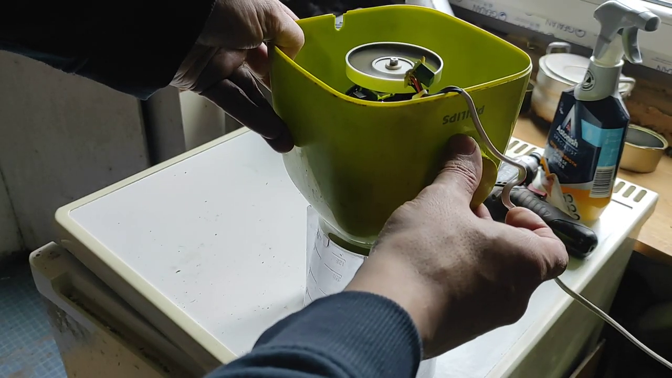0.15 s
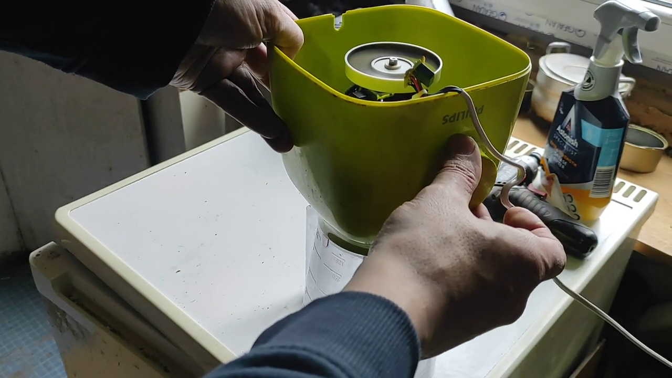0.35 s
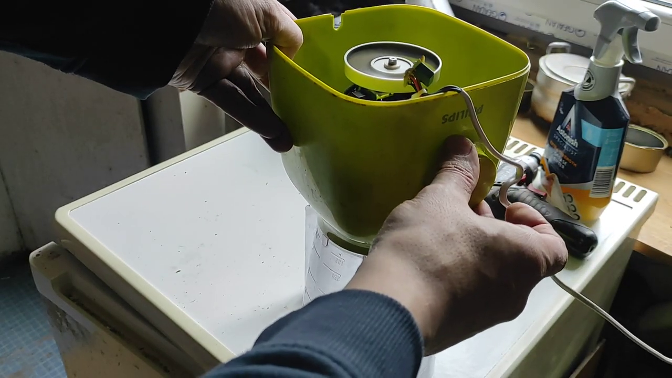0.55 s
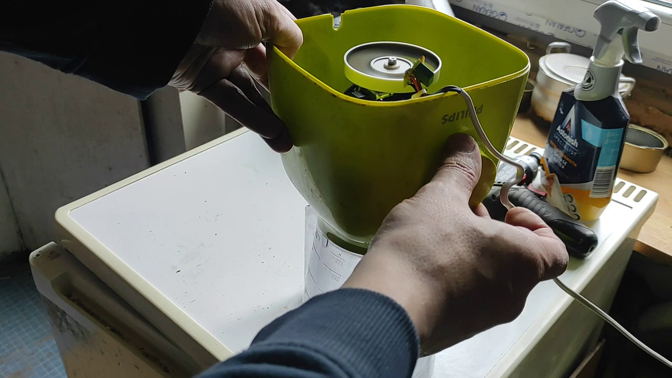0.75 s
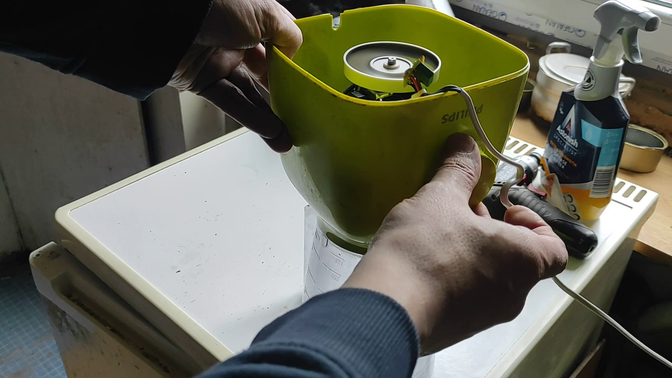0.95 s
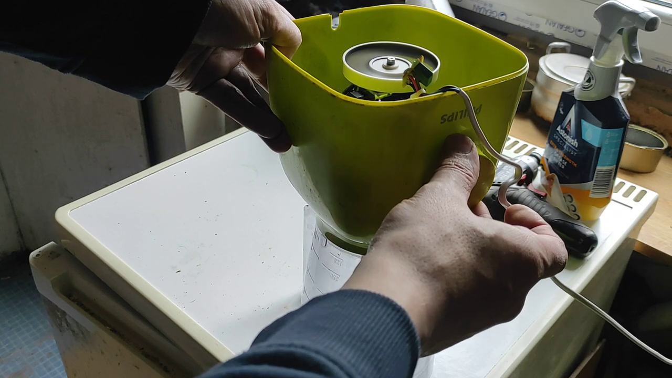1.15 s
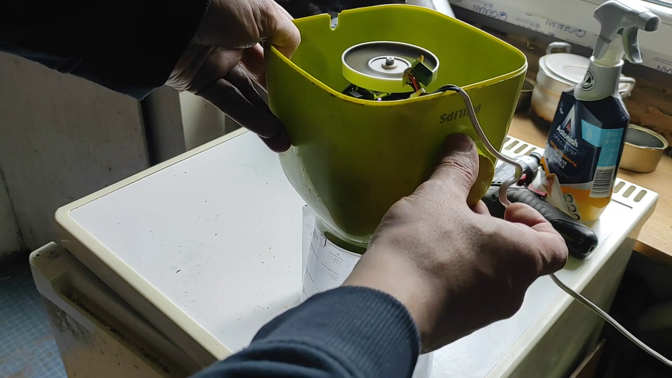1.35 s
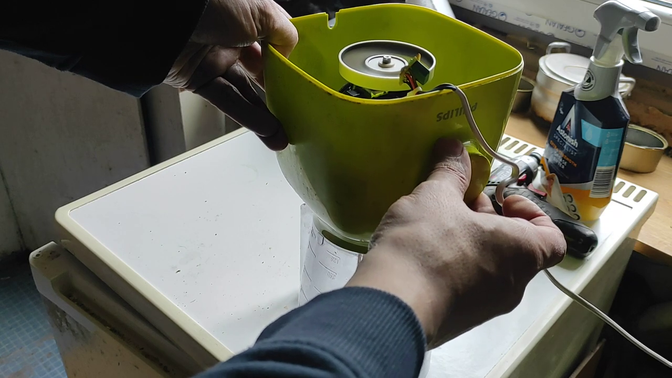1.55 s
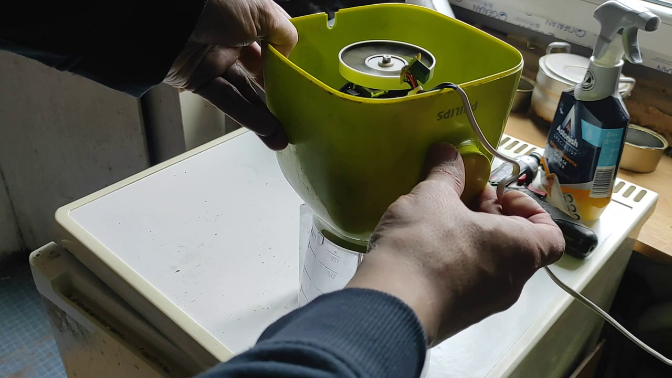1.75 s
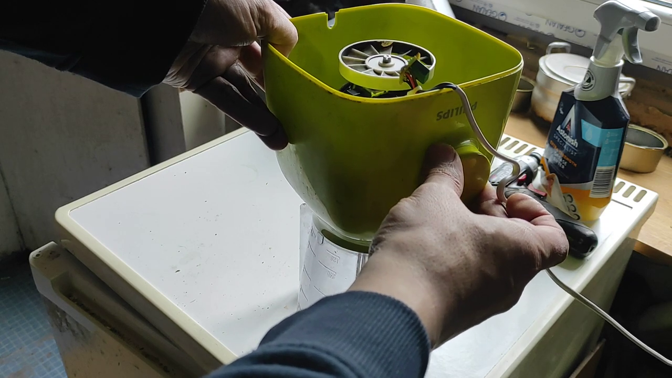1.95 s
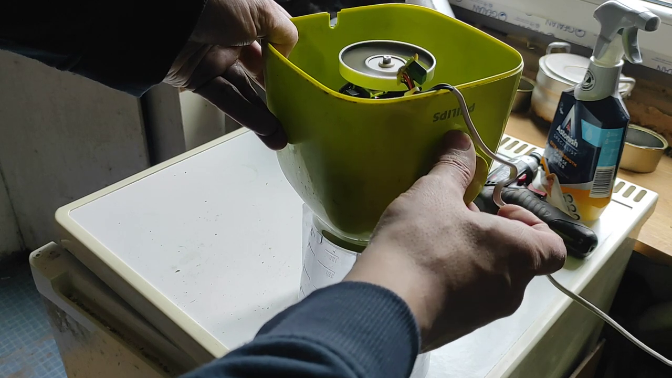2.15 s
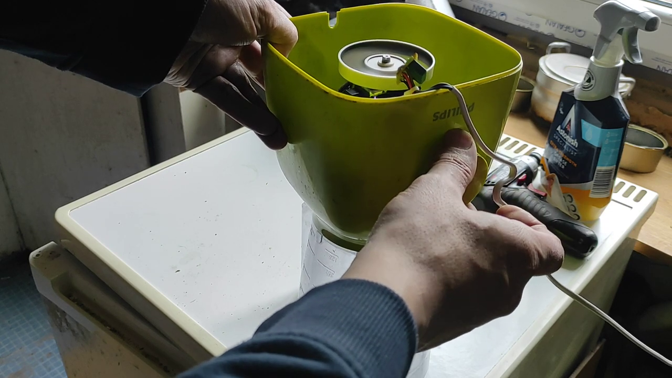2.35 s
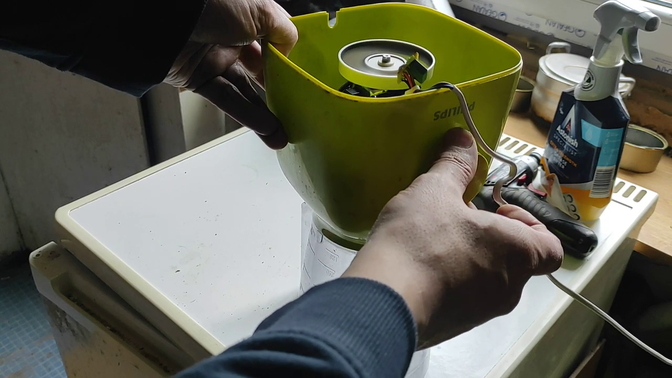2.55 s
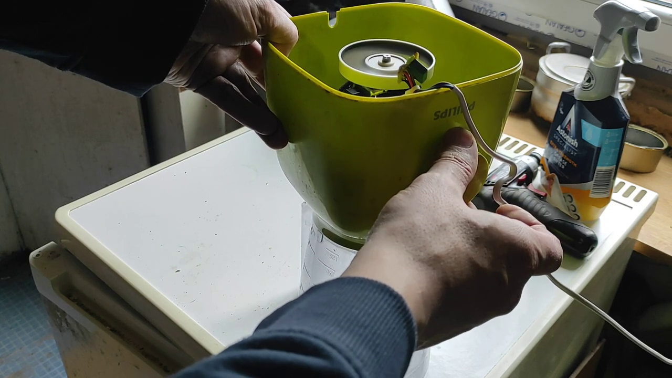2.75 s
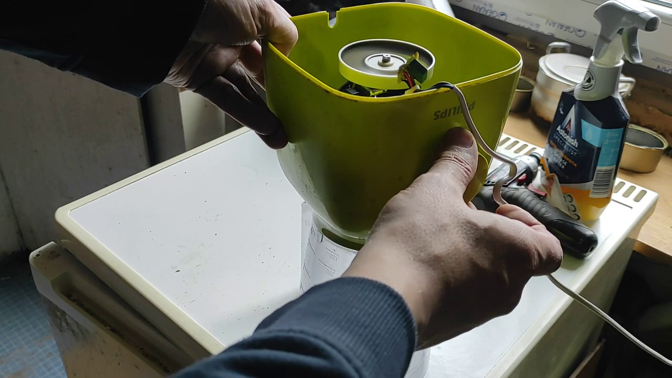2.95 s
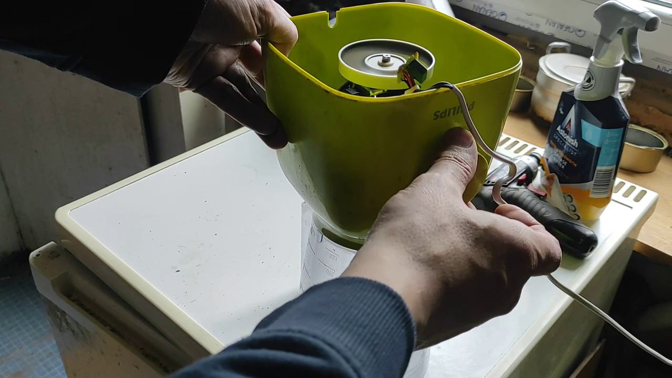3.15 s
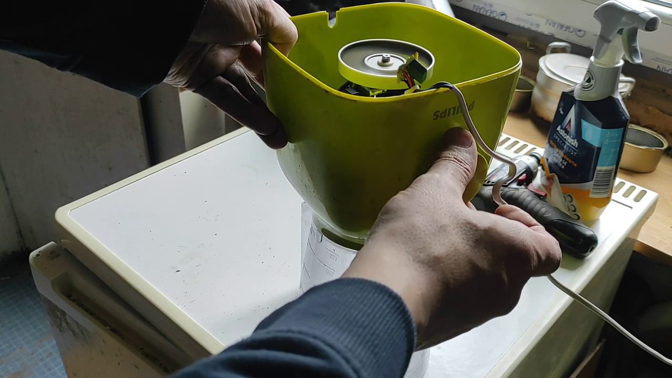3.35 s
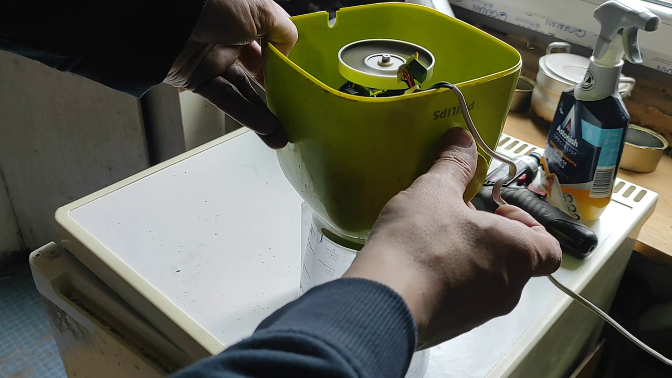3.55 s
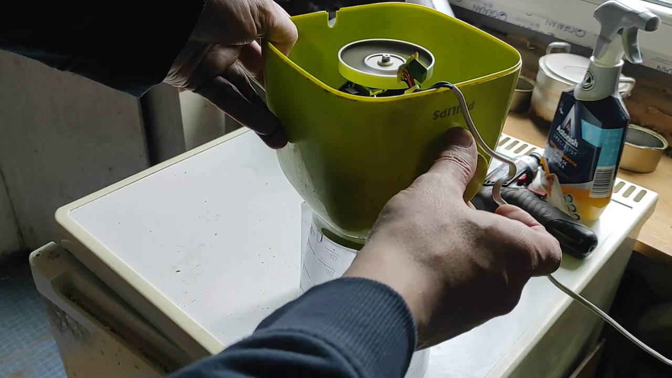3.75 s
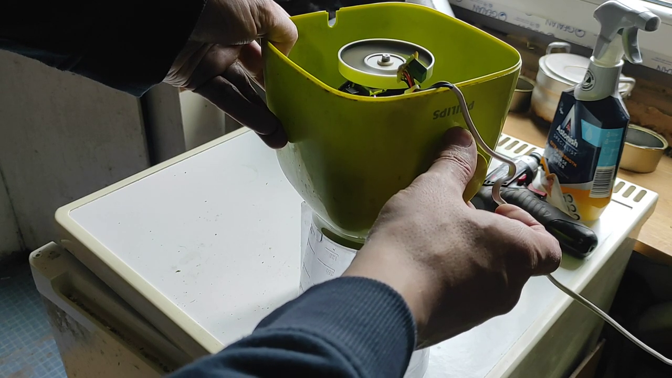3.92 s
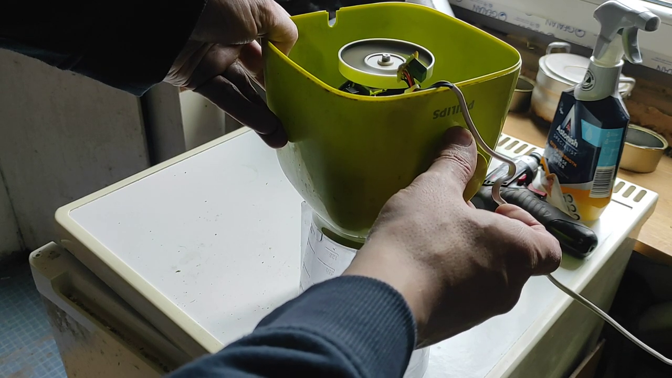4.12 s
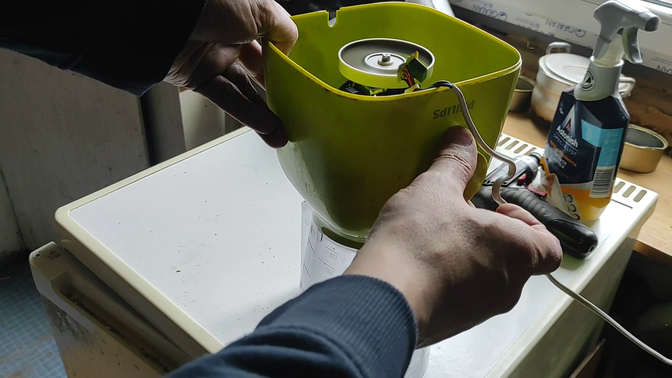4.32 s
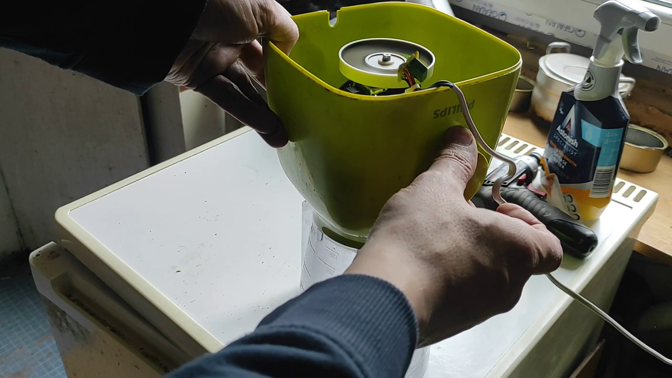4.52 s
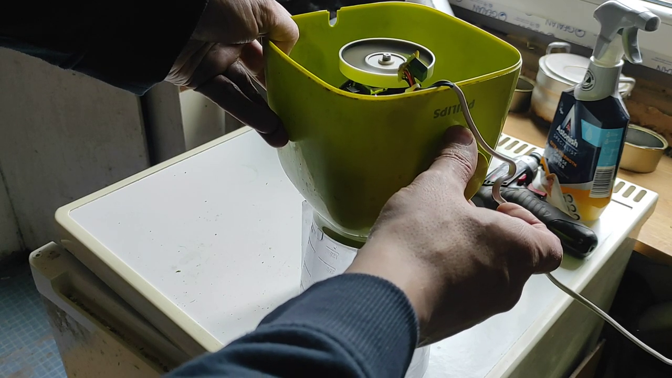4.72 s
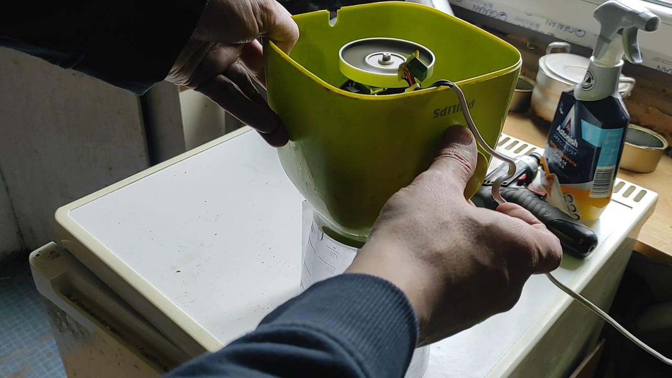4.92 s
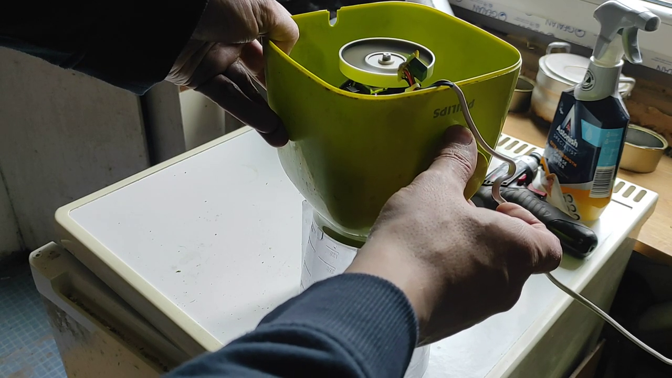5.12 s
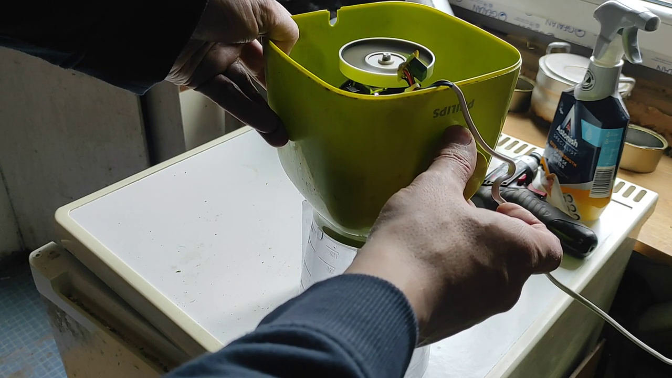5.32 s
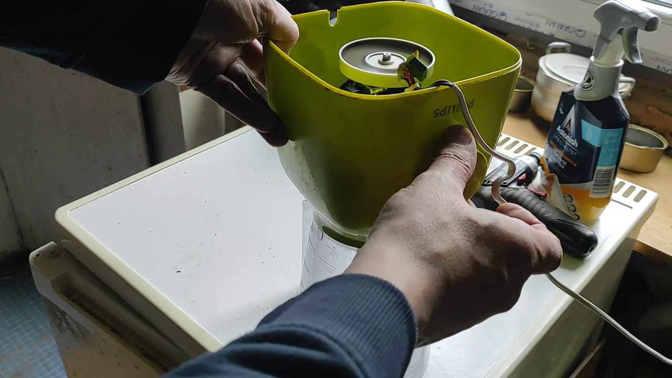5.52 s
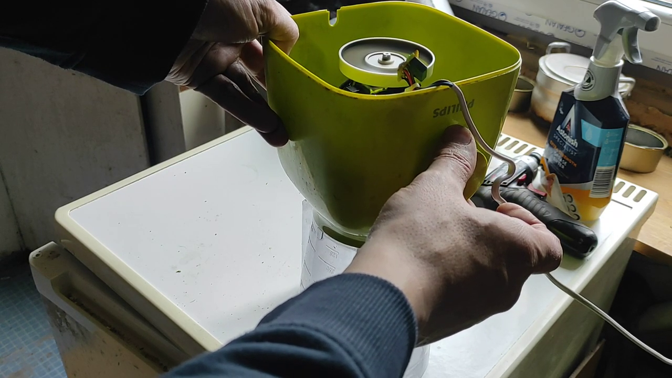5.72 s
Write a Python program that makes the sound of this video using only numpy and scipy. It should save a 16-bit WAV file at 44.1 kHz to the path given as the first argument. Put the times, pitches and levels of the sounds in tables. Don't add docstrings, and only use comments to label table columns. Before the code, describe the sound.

A bare blender motor in an open plastic base runs loudly, close to a phone microphone in a small, fairly dry room. From 0 s it is already near full speed: a rough, bright, rattling roar of brushes and loose bearings, with a low hum around 240 Hz and a thin high whine near 5.7 kHz. At about 1.2 s the power is cut; the electrical whine vanishes and the worn bearing gives a harsh, multi-toned squeal with clatter, its pitches shifting as the rotor slows, abruptly halting around 1.85 s with a short ring. Near-silence follows, only faint room noise and a light rub on the switch near 2.1 s. At about 2.18 s the motor jolts on, its whine sweeping up within half a second. It then roars steadily to the end near 6 s, fluttering with small irregular surges and dips.

```python
import sys
import numpy as np
from scipy import signal
from scipy.fft import rfft, irfft
from scipy.io import wavfile
from scipy.ndimage import uniform_filter1d, minimum_filter1d

SR = 44100
rng = np.random.default_rng(int(sys.argv[2]) if len(sys.argv) > 2 else 0)


def store_wav(level_fs):
    pcm = np.round(np.clip(np.atleast_2d(level_fs), -1, 1) * 32767)
    wavfile.write(sys.argv[1], SR, pcm.T.astype(np.int16))


def gain_from_decibels(decibels):
    exponent = np.asarray(decibels, float) / 20
    return 10 ** exponent


N = 259308
TIME = np.arange(N) / SR

SWITCH_ON_S, SWITCH_OFF_S = (-.21, 2.181), 1.185
FULL_HZ = 239.5
# [t/s, shaft f/Hz, whirl centre f/Hz, squeal level/dB]
COAST = [(1.19, 244, 806, -29), (1.26, 215, 827, -26), (1.31, 201, 826, -25), (1.37, 183, 807, -26),
         (1.55, 172, 800, -28), (1.6, 165, 801, -26), (1.71, 100, 808, -22), (1.79, 46, 802, -22),
         (1.835, 20, 790, -22)]


def level(x, db):
    return x * gain_from_decibels(db) / np.sqrt(np.mean(x ** 2))


def columns(table, **ends):
    s, *rest = np.transpose(table)
    return [np.interp(TIME, s, c, **ends) for c in rest]


def on_log(hz, table):
    points = np.array(table)
    return np.interp(np.log(hz + 1), np.log(points[:, 0]), points[:, 1])


def ramp(start_s, length_s):
    return np.clip((TIME - start_s) / length_s, 0, 1)


def colour(x, spectrum, modes=(), size=2 ** 15):
    hz = np.fft.rfftfreq(size, 1 / SR)
    db = on_log(hz, spectrum)
    for mode_hz, width_hz, mode_db in modes:
        resonance = (gain_from_decibels(mode_db) - 1) / (1 + (2 * (hz - mode_hz) / width_hz) ** 2)
        db = db + 20 * np.log10(1 + resonance)
    ceps = irfft(db * np.log(10) / 20)
    ceps[1:size // 2] *= 2
    ceps[size // 2 + 1:] = 0
    impulse = irfft(np.exp(rfft(ceps)))[None, :size // 2]
    return signal.fftconvolve(x, impulse, axes=-1)[:, :N]


def walk(rate):
    k = int(SR / rate)
    held = np.repeat(rng.standard_normal(N // k + 1), k)
    return 1.1 * uniform_filter1d(uniform_filter1d(held, k), k)[:N]


def tone(hz, rough, rate):
    rough = np.clip(rough, 0, 1)
    waver = np.sqrt(1 - rough) + np.sqrt(rough / 2) * (walk(rate) + 1j * walk(rate))
    return np.sqrt(2) * np.real(waver * np.exp(2j * np.pi * np.cumsum(hz) / SR))


def shaft():
    creep_hz_per_s = 1.5
    climb_hz, climb_s, kick_s = 128, .25, .09
    age = np.where(TIME < SWITCH_ON_S[1], TIME - SWITCH_ON_S[0], TIME - SWITCH_ON_S[1])
    climb = climb_hz * np.exp(-age / climb_s)
    kick = (FULL_HZ - climb_hz) * np.exp(-age / kick_s)
    powered = FULL_HZ + creep_hz_per_s * age - climb - kick
    coasting = (TIME > SWITCH_OFF_S) & (TIME < SWITCH_ON_S[1])
    return np.where(coasting, columns(COAST)[0], np.maximum(powered, COAST[-1][1]))


def effort(shaft_hz, coast):
    # [powered level/dB, lost at standstill/dB, share of surges, coasting level/dB, lost slowing/dB]
    rattle_bands = [
        (-29, 5, 0.36, -22, 12.5),
        (-23, 9.5, 0.92, -14, 5),
        (-17.5, 11, 0.89, -15, -0.3),
    ]
    # [t/s, level/dB]
    lulls = [(.011, 3.5), (.088, -0.5), (.145, 0), (.653, -3), (.718, 0.5), (.983, -0.5), (1.051, -0.5),
             (1.129, -1.5), (2.22, -2), (2.817, -3), (3.072, -2), (3.155, -1.5), (3.234, -5.5),
             (3.475, -2.5), (3.548, -3), (3.656, -4.5), (3.758, -3), (3.921, -5.5), (4.056, -2.5),
             (4.215, -2), (4.353, -6.5), (4.681, -6), (4.914, -5.5), (5.101, -5.5), (5.396, -2),
             (5.74, -4.5)]
    # [t/s, level/dB]
    bursts = [(.064, 9), (.186, 6), (.257, 4.5), (.536, 3), (.813, 4.5), (.911, 9.5), (1.2, 9), (2.192, 1),
              (2.256, 4.5), (2.444, 3.5), (2.55, 2.5), (2.76, 5), (2.931, 1.5), (3.034, 3), (3.18, 2),
              (3.279, 0.5), (3.371, -1), (3.704, 3), (4.106, 3), (4.465, 3.5), (4.616, 4), (5.005, 2.5),
              (5.173, 4), (5.333, 1.5), (5.83, 1.5)]
    lull_s, burst_s = .022, .015
    jolts_db, jolt_s = (8, 2.5, 1.5), .04
    stop_s, release_s, attack_s = 1.84, .069, .003
    grip_power = 1.9

    surge = 0
    for rows, width_s in ((lulls, lull_s), (bursts, burst_s)):
        for s, db in rows:
            surge = surge + db * np.exp(-((TIME - s) / width_s) ** 2)
    speed = shaft_hz / FULL_HZ
    jolt = np.exp(-abs(TIME - SWITCH_ON_S[1]) / jolt_s)
    halting = (1 - ramp(stop_s, release_s)) ** 2
    turning = np.where(TIME < SWITCH_ON_S[1], halting, ramp(SWITCH_ON_S[1], attack_s))
    gains = []
    for (on_db, idle_db, share, off_db, slow_db), jolt_db in zip(rattle_bands, jolts_db):
        powered_db = on_db - idle_db * (1 - speed ** grip_power)
        coasting_db = off_db - slow_db * (1 - speed)
        steady_db = (1 - coast) * powered_db + coast * coasting_db
        gains.append(turning * gain_from_decibels(share * surge + jolt_db * jolt + steady_db))
    return gains


def knocking(shaft_hz, coast):
    knock_db, flutter_db, mains, turn = 3, .5, .13, .065
    mains_phase = 2 * np.pi * 50 * TIME
    pulses = np.cos(mains_phase) + .92 * np.cos(2 * mains_phase)
    beat = 1 + (1 - coast) * mains * pulses
    beat *= 1 + turn * np.cos(2 * np.pi * np.cumsum(shaft_hz) / SR + 1.3 * walk(30))
    sizes = np.minimum(rng.exponential(size=N // 8 + 1), 3.5)
    knocks = beat * gain_from_decibels(knock_db * np.repeat(sizes, 8)[:N] + flutter_db * walk(40))
    return level(knocks * rng.standard_normal((2, N)), 0)


def rattle(shaft_hz):
    # [f/Hz, level/dB per Hz]
    powered_spectrum = [(15, -60), (25, -25.5), (125, -15), (238, -7.5), (272, -12), (430, -7), (491, -13),
                        (547, -6), (840, -13.5), (1690, -11.5), (3670, -7.5), (5960, -9), (8440, -10.5),
                        (9910, -18), (15200, -36.5)]
    # [f/Hz, level/dB per Hz]
    coasting_spectrum = [(15, -63), (25, -28), (128, -27.5), (182, -13), (311, -14), (396, -1.5), (478, -9),
                         (625, -8.5), (818, -13), (961, -10.5), (1560, -12), (2210, -7.5), (3770, -5.5),
                         (7000, -1.5), (15200, -30)]
    # [f/Hz, width/Hz, powered level/dB, coasting level/dB]
    case_modes = [(407, 36, 0, 3), (551, 41, 6, 11), (630, 22, 4.5, 3), (745, 8, -3, 9.5),
                  (1224, 43, 1.5, 5.5), (1402.5, 21, 8, 6), (1622, 99, 5, 3.5), (1716, 41, 11.5, 4),
                  (1879, 47, 5, 11), (1932, 64, 4.5, 2), (2104.5, 30.4, 9.5, 13), (2231, 71, 4.5, 9),
                  (2671, 74, -8, -1), (2692, 40, 8.5, 3.5), (3680, 193, -8, -7.5), (3067, 98, -7.5, 2),
                  (2530, 34, -3, 1.5), (3860, 8.7, -11, 6), (5100, 25, -2, -22), (5747, 92, 8.5, -16),
                  (6080, 144, 6.5, 3.5), (6770, 41, 7.5, 3.5), (7230, 450, 7, 3), (7780, 70, 7.5, 3)]

    coast = ramp(SWITCH_OFF_S - .01, .012) * (TIME < SWITCH_ON_S[1] - .05)
    knocks = knocking(shaft_hz, coast)
    bass, middle, treble = effort(shaft_hz, coast)
    rumble = treble * shaft_hz / FULL_HZ * gain_from_decibels(-9)
    bands = ((150, "low", rumble, 7.7), ((150, 1050), "band", bass, 1),
             ((1050, 3750), "band", middle, 1), (3750, "high", treble, 1))
    states = ((1 - coast, powered_spectrum, 2), (coast, coasting_spectrum, 3))
    steady = slice(3 * SR, 5 * SR)
    out = 0
    for edges, kind, gain, division in bands:
        sos = signal.butter(3, edges, kind, fs=SR, output="sos")
        for state, spectrum, k in states:
            modes = [(m[0], m[1], m[k]) for m in case_modes]
            reference = signal.sosfiltfilt(sos, colour(knocks[:1, steady], spectrum, modes))
            ringing = signal.sosfiltfilt(sos, colour(knocks * gain * state, spectrum, modes))
            out = out + ringing / (division * np.std(reference))
    return out


def whine(shaft_hz):
    # [shaft f/Hz, imbalance level/dB, bar level/dB, octave level/dB]
    drive_by_speed = [(80, -80, -70, -85), (150, -46, -56, -58), (175, -37, -48, -51),
                      (198, -35, -37, -44.5), (214, -37, -28, -43.5), (228, -37, -32, -43.5),
                      (236, -35.5, -39, -43.5), (240, -35, -42, -43.5), (243, -34.5, -38, -43.5)]
    fan_db, fade_db_per_s = -9, 200
    speeds, *lines_db = np.transpose(drive_by_speed)
    hum_db, bars_db, octave_db = (np.interp(shaft_hz, speeds, db) for db in lines_db)
    unpowered_s = np.maximum(TIME - SWITCH_OFF_S, 0) * (TIME < SWITCH_ON_S[1])
    live = gain_from_decibels(-fade_db_per_s * unpowered_s)
    hum = gain_from_decibels(hum_db) * tone(shaft_hz, rough=.03, rate=20) * np.array([[1], [0]])
    rippled = shaft_hz * (1 + .003 * walk(250))
    bars = gain_from_decibels(bars_db) * tone(24 * rippled, rough=.1, rate=60)
    high = []
    for _ in range(2):
        octave = tone(48 * rippled, rough=.35, rate=300)
        fan = tone(60 * rippled, rough=.9, rate=500)
        high.append(octave + gain_from_decibels(fan_db) * fan)
    return hum, live * (bars + gain_from_decibels(octave_db) * np.array(high))


def squeal():
    # [backward order, forward order, rocking order, level/dB, roughness 0-1]
    whirl_tones = [(1, 0, 0, 1.5, .06), (0, 1, 0, -7, .2), (2, 0, 0, -6, .4), (2, 1, 0, 2, .3),
                   (2, 1, -1, -5, .5), (1, 0, -1, -12, .3), (0, 0, 1, -11, .8), (3, 0, -1, -9, .8),
                   (3, 1, -1, -9, .8), (0, 1, -1, -8, .4)]
    rock_hz = 402
    sag_hz_per_s, attack_s, release_s = 8000, .015, .04
    spin, centre, db = columns(COAST)
    halt_s = COAST[-1][0]
    back = centre - spin - sag_hz_per_s * np.clip(TIME - halt_s, 0, release_s)
    forward = centre + spin
    gate = gain_from_decibels(db) * ramp(SWITCH_OFF_S - attack_s, attack_s) ** 2 * (1 - ramp(halt_s, release_s))
    touch = 1 - .9 * ramp(halt_s - .005, .02)
    pair = np.zeros((2, N))
    for radiation in pair:
        for k, (a, b, c, tone_db, rough) in enumerate(whirl_tones):
            partial = gain_from_decibels(tone_db) * tone(a * back + b * forward + c * rock_hz, rough, rate=44)
            radiation += partial * (1 if k == 0 else touch)
    return pair * gate * [[1.1], [.4]]


def room(direct):
    t60_s, room_db = .245, -9
    t = TIME[:SR // 2]
    echo = rng.standard_normal((2, len(t))) * gain_from_decibels(-60 * t / t60_s) * (t > .004)
    echo *= gain_from_decibels(room_db) / np.sqrt(np.sum(echo ** 2, axis=1, keepdims=True))
    return signal.fftconvolve(direct, echo, axes=1)[:, :N]


def ports(pair):
    # [f/Hz, share common to both ports 0-1]
    alike = [(100, 0.98), (500, 1), (1000, 0.88), (2000, 0.62), (4000, 0), (8000, 0.09), (14000, 1)]
    # [f/Hz, left minus right level/dB]
    left_excess = [(60, 9.5), (110, 1), (200, 3), (380, 0.5), (690, 1), (1280, 5.5), (2360, -1),
                   (4350, 0.5), (8020, 0.0), (14800, -2)]
    # [f/Hz, lead of the left port/rad]
    left_lead = [(0, 0), (2330, 0.79), (4050, -7.5), (5340, -15), (5860, -7.5), (6120, -4.5), (8010, -7),
                 (8790, -8.5), (10800, -8), (11500, -18.5), (12200, -16), (13100, -17), (14000, -19.5),
                 (15000, -63.5)]
    hz = np.fft.rfftfreq(N, 1 / SR)
    c = np.clip(on_log(hz, alike), 0, 1)
    tilt = gain_from_decibels(on_log(hz, left_excess) / 2) * np.exp(.5j * on_log(hz, left_lead))
    mid, side = rfft(pair) * np.sqrt([(1 + c) / 2, (1 - c) / 2])
    return irfft(np.array([(mid + side) * tilt, (mid - side) / tilt]), N)


def workshop():
    # [f/Hz, level/dB per Hz]
    floor_spectrum = [(20, -14), (60, -14), (110, -12), (245, -4), (450, -20), (760, -17), (2200, -23),
                      (7000, -30), (12000, -44), (15600, -66)]
    # [t/s, level/dB]
    finger_rubs = [
        (2.095, -66.5),
        (2.115, -65),
        (2.17, -63),
    ]
    # [f/Hz, level/dB]
    nearby_hum = [(1087, -67)]
    rub = sum(gain_from_decibels(db) * np.exp(-((TIME - s) / .0099) ** 2) for s, db in finger_rubs)
    sos = signal.butter(2, (4500, 8500), "band", fs=SR, output="sos")
    hiss = level(signal.sosfilt(sos, rng.standard_normal((2, N))), 0)
    hum = sum(gain_from_decibels(db) * tone(np.full(N, 1. * hz), rough=.05, rate=10) for hz, db in nearby_hum)
    floor = level(colour(rng.standard_normal((2, N)), floor_spectrum), -63.5)
    return floor + rub * hiss + hum * np.array([[1], [0]])


def scene():
    shaft_hz = shaft()
    noise = rattle(shaft_hz)
    hum, bars = whine(shaft_hz)
    lines = hum + squeal()
    walls = room(noise + .4 * lines)
    return ports(noise + lines + walls + workshop()) + bars


def mask(x):
    # [f/Hz, level/dB]
    masked_below = [(900, -40), (1500, -12), (2400, -5.5), (3700, -4.5), (5200, -4), (6500, -9), (8300, -7),
                    (9300, -1), (11000, -1), (13000, -1.5), (15300, -2.5)]
    size, window = 2048, ("kaiser", 5)
    wide_hz = 9200
    hz, s, z = signal.stft(x, SR, window, size)
    power = np.sum(np.abs(z) ** 2, axis=0)
    threshold = gain_from_decibels(2 * on_log(hz, masked_below))[:, None]

    def over(patch, around):
        return uniform_filter1d(power, patch, axis=0) > uniform_filter1d(power, around, axis=0) * threshold

    heard = np.where(hz[:, None] < wide_hz, over(6, 45), over(14, 100)) * 1.
    heard = minimum_filter1d(minimum_filter1d(heard, size=4, axis=0), size=2, axis=1)
    heard[:, abs(s - SWITCH_ON_S[1] + .1) < .125] = 1
    return signal.istft(z * heard, SR, window, size)[1][:, :N]


def low_pass(x):
    return signal.sosfilt(signal.butter(12, 15380, fs=SR, output="sos"), x)


def record(dry):
    dry = signal.sosfilt(signal.butter(1, 55, "high", fs=SR, output="sos"), dry)
    headroom = np.minimum(1, .93 / (np.max(np.abs(dry), axis=0) + 1e-9))
    gain = uniform_filter1d(minimum_filter1d(headroom, size=129), size=129)
    return low_pass(mask(dry * gain))


dry = scene()
out = record(dry)
store_wav(out)
```